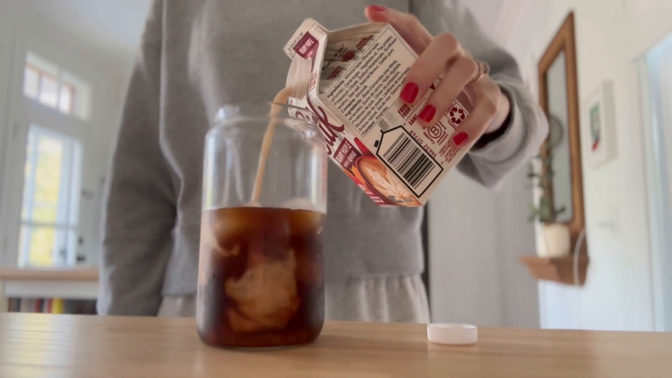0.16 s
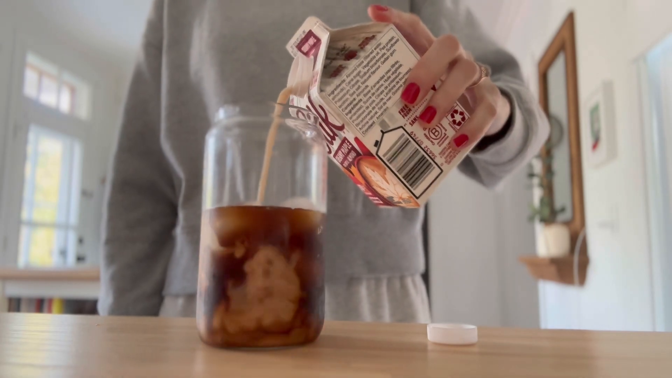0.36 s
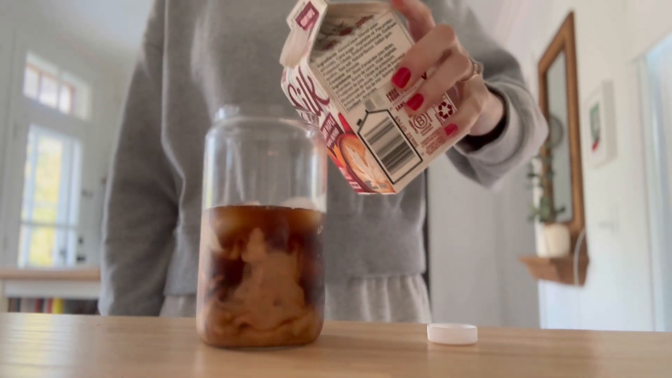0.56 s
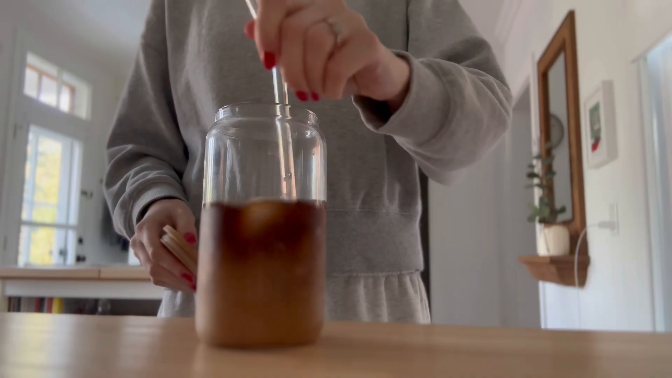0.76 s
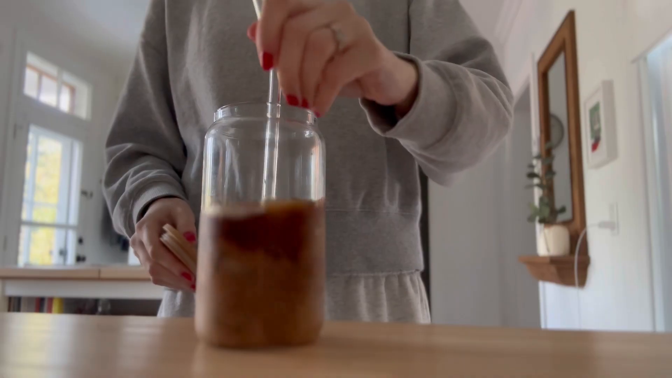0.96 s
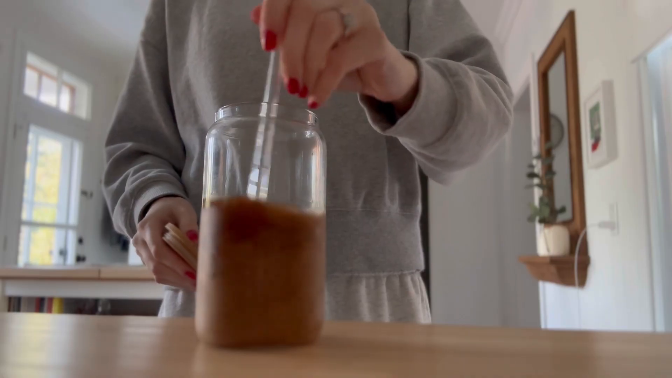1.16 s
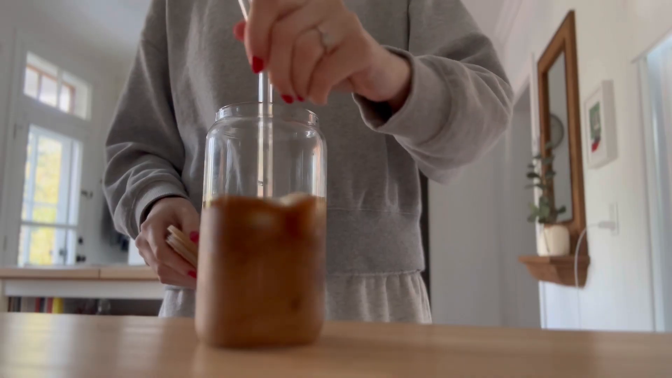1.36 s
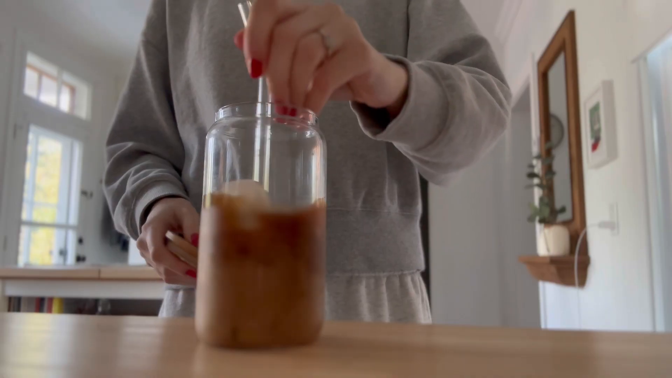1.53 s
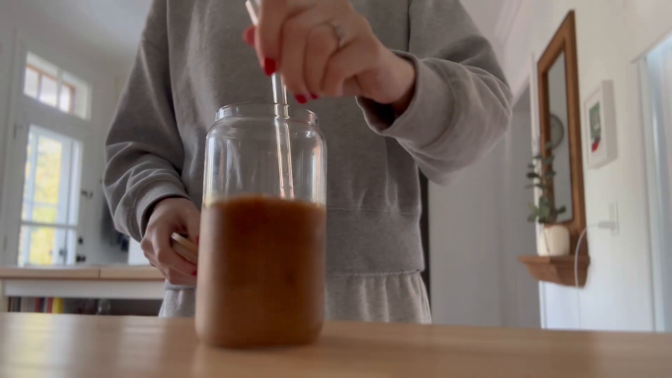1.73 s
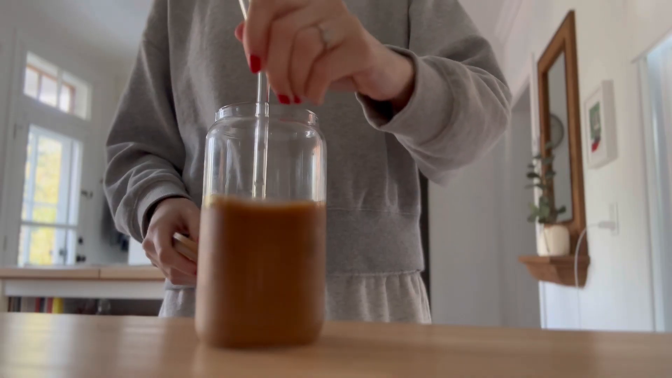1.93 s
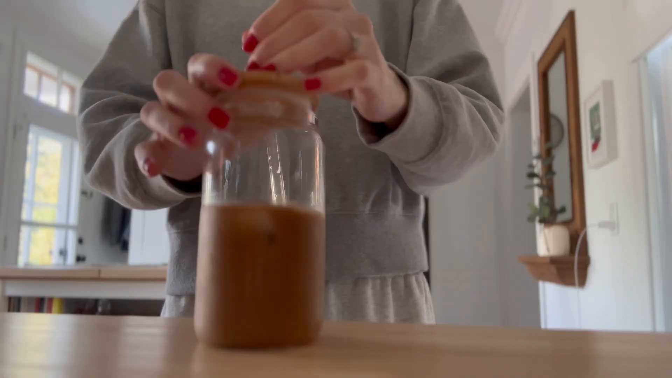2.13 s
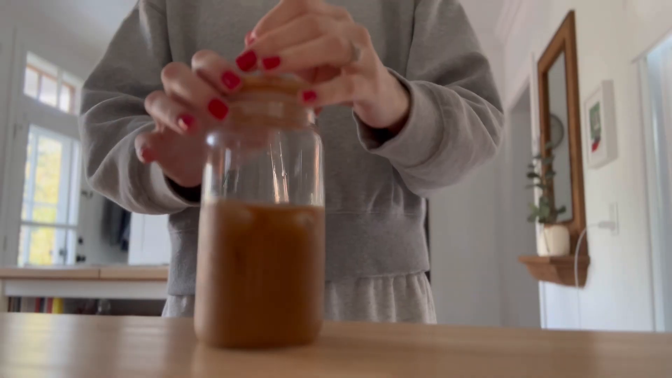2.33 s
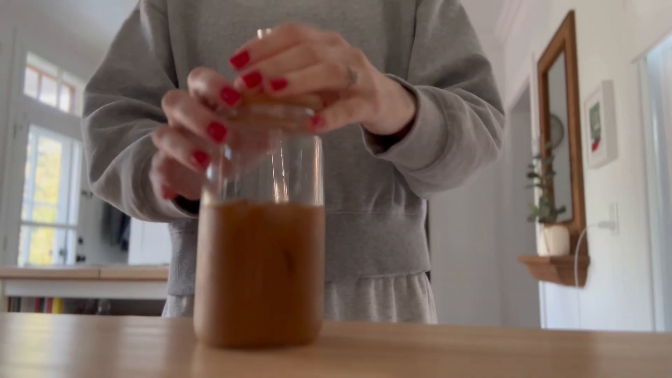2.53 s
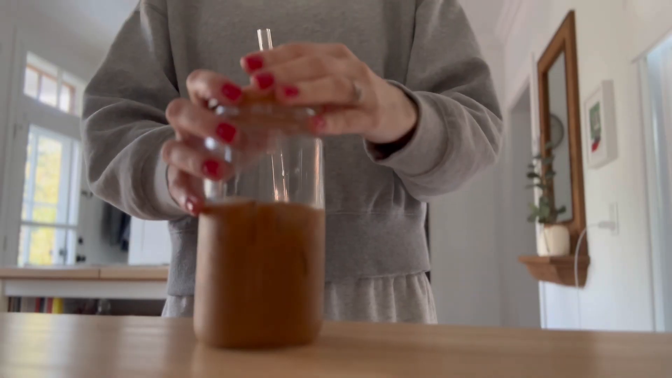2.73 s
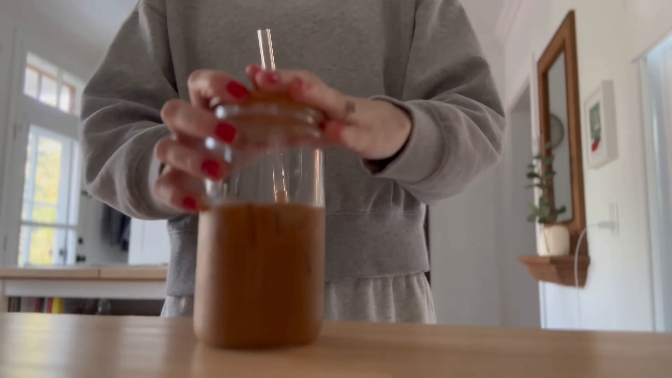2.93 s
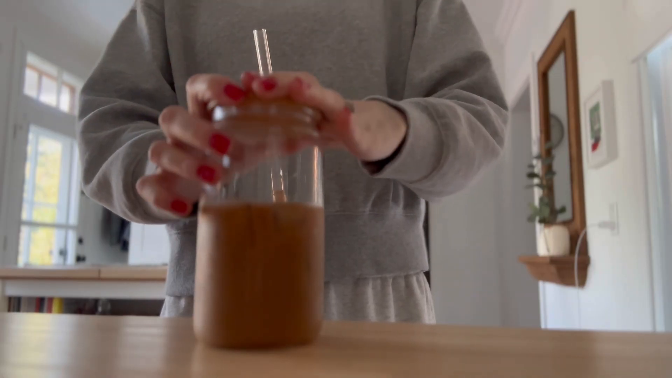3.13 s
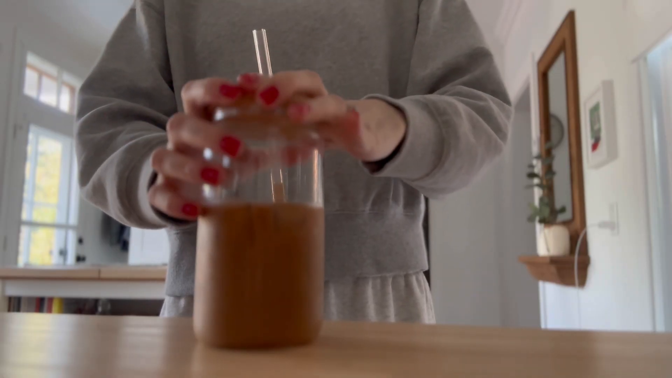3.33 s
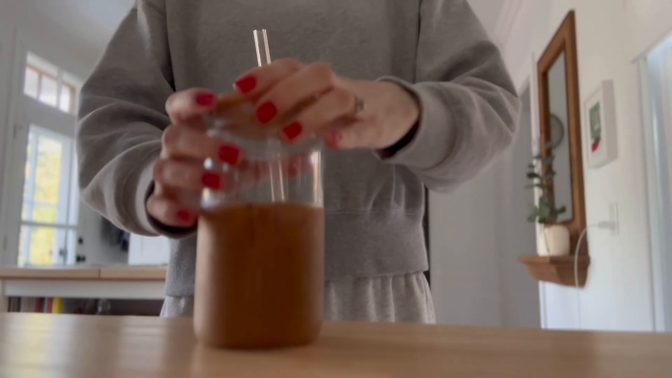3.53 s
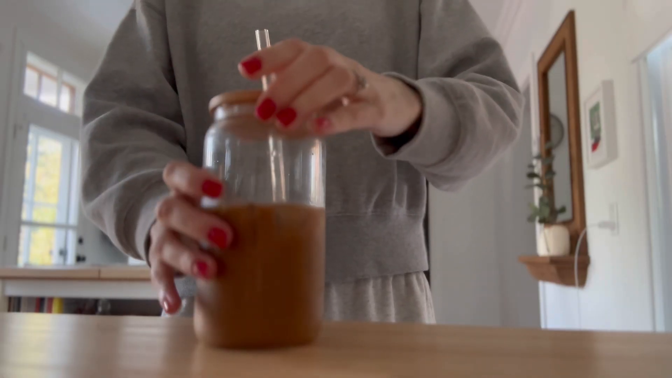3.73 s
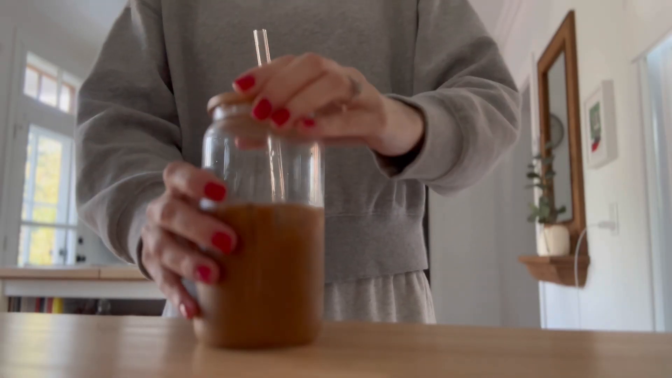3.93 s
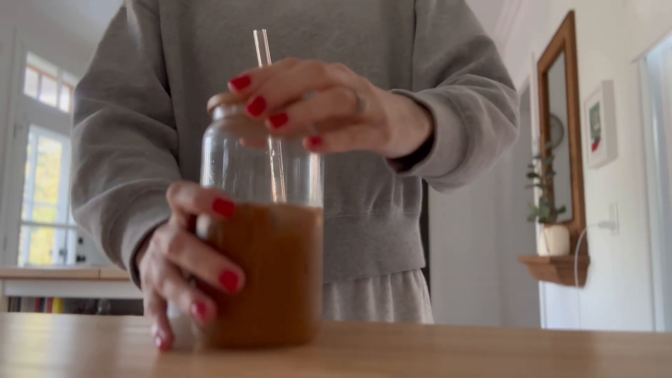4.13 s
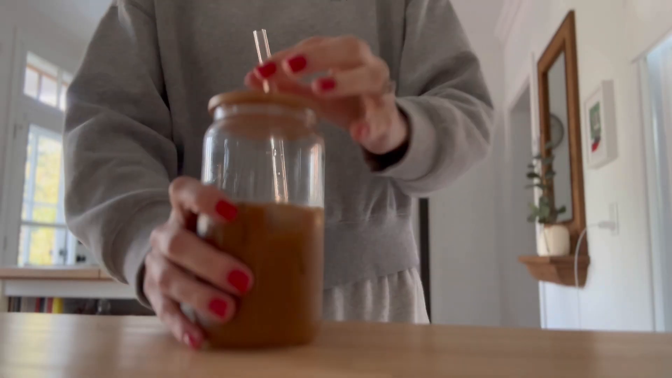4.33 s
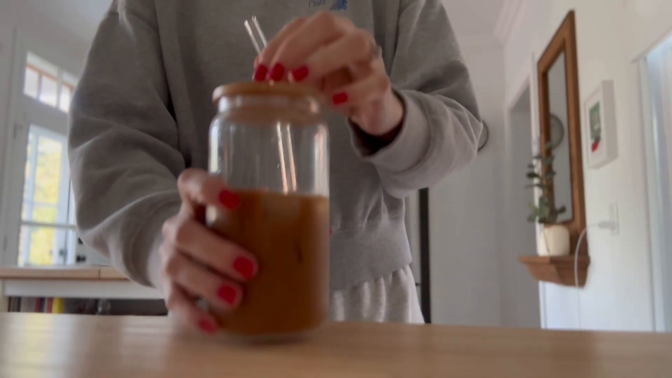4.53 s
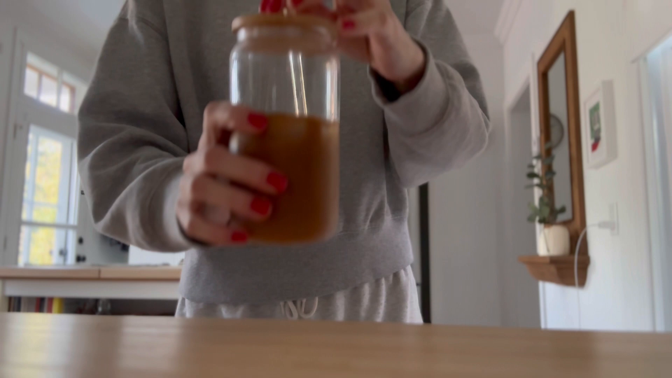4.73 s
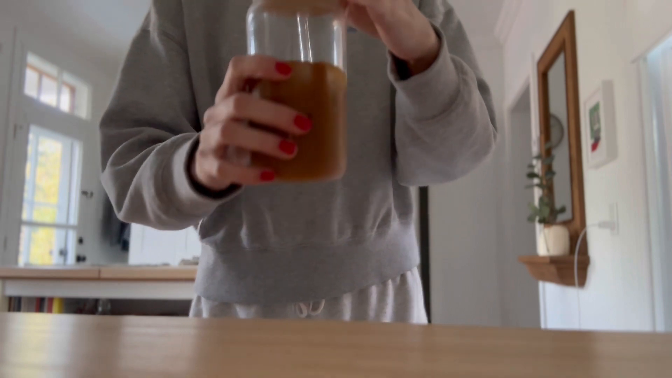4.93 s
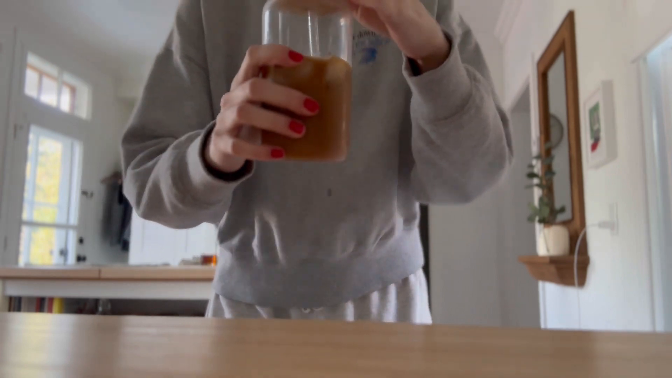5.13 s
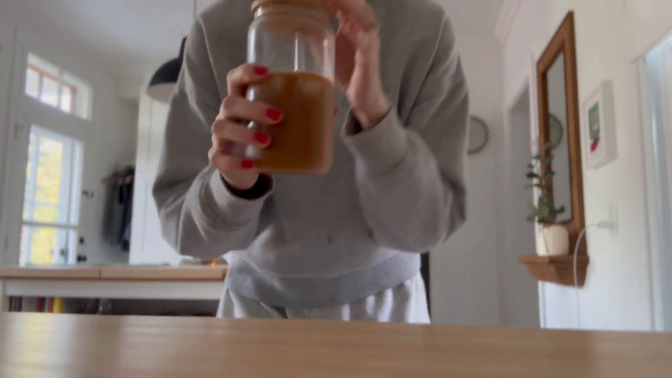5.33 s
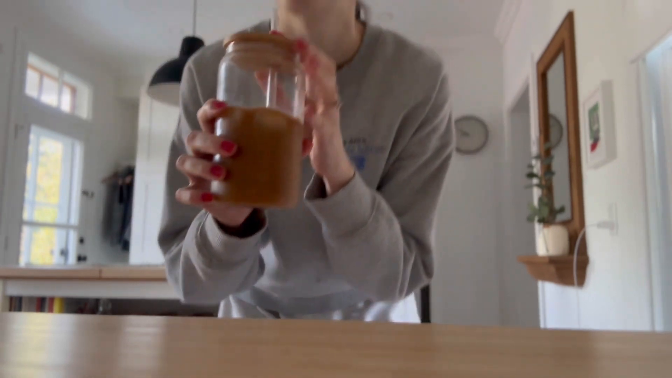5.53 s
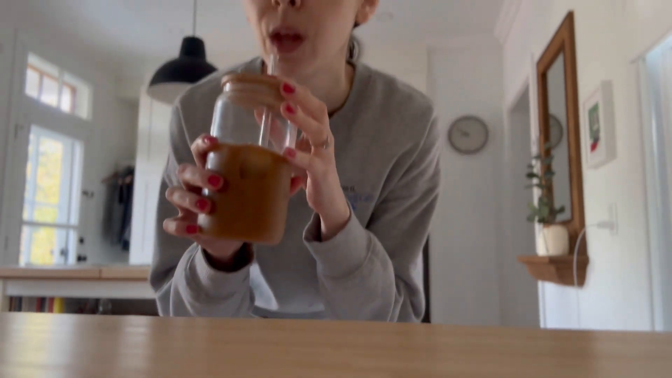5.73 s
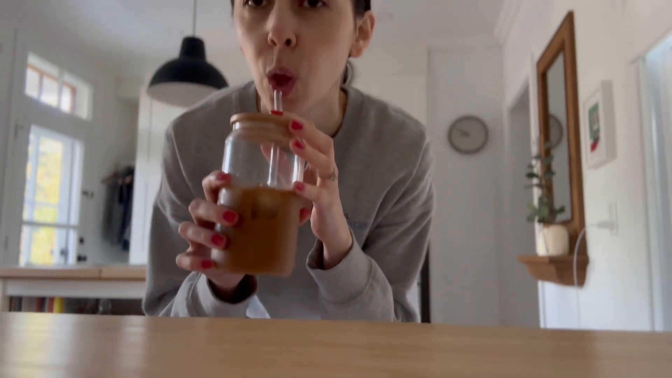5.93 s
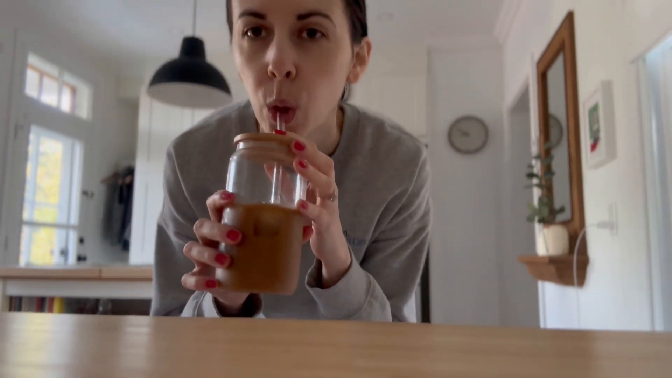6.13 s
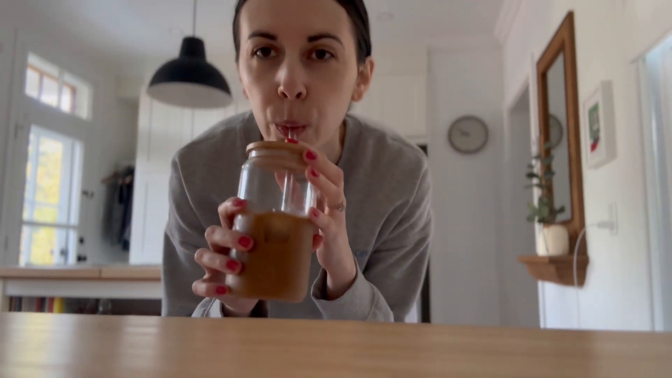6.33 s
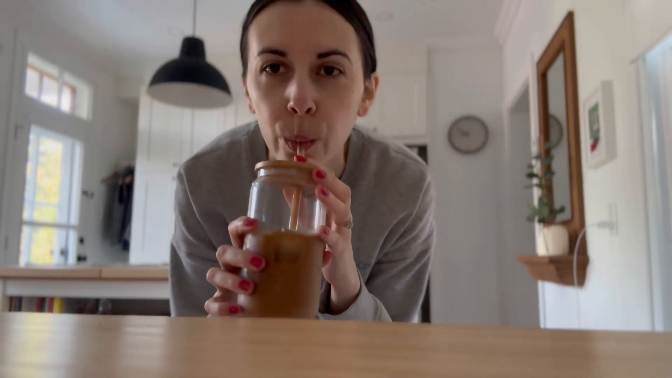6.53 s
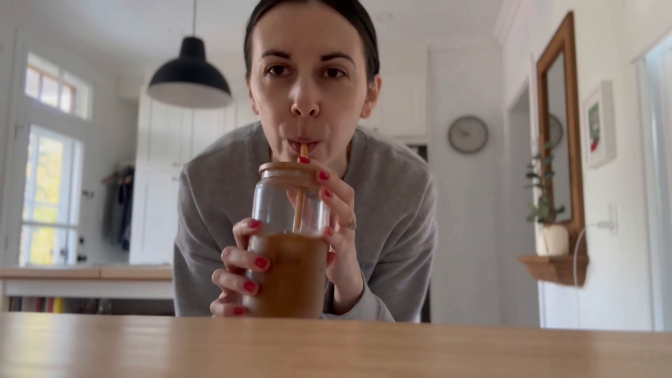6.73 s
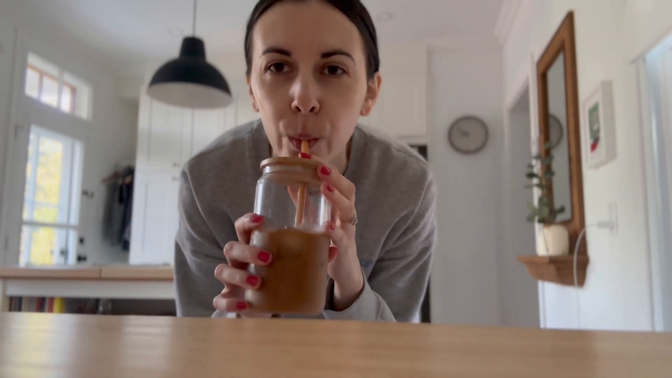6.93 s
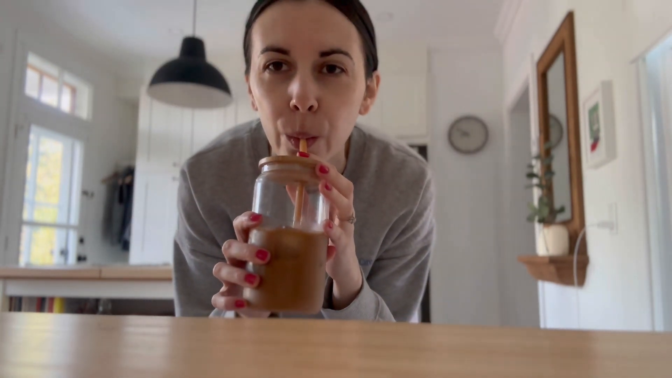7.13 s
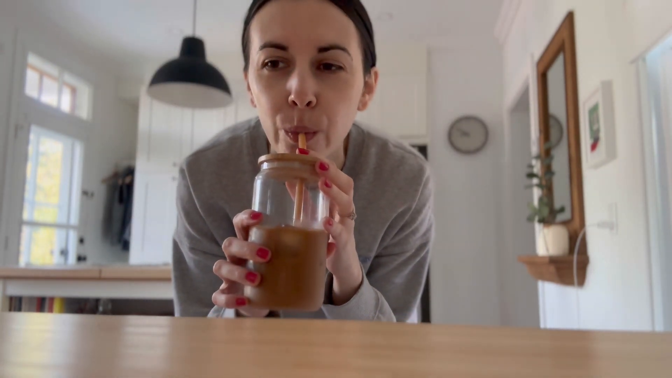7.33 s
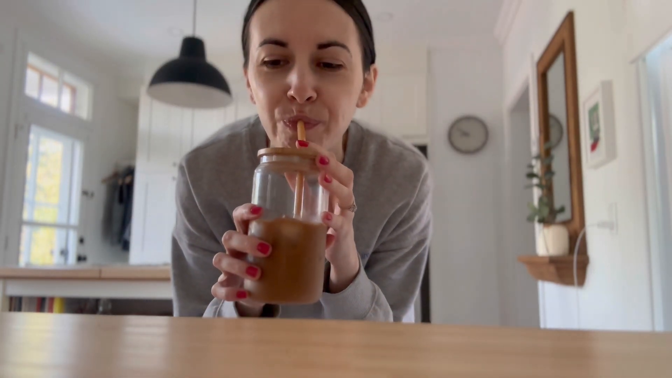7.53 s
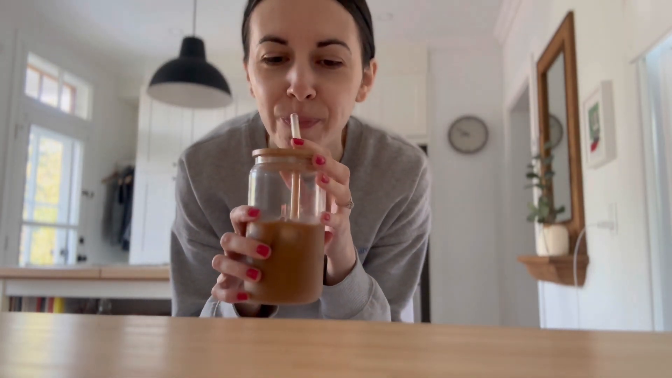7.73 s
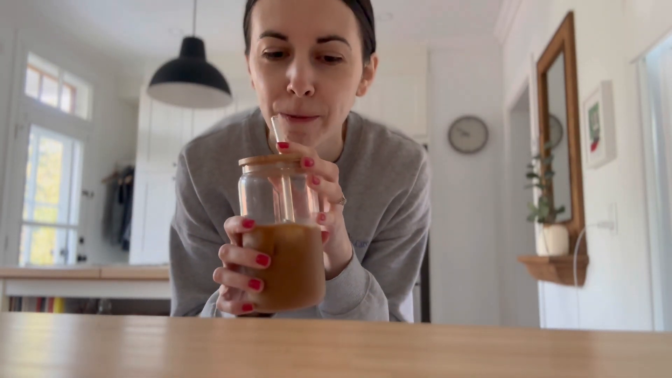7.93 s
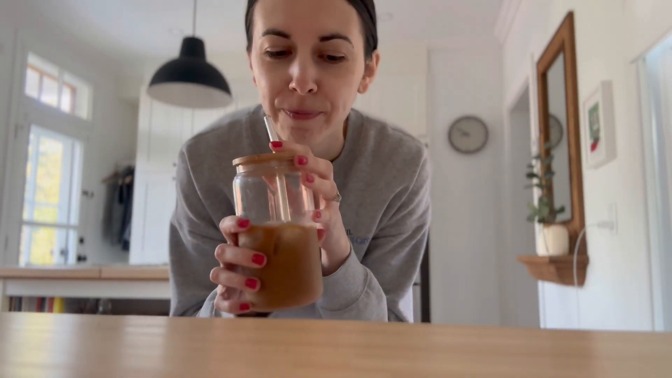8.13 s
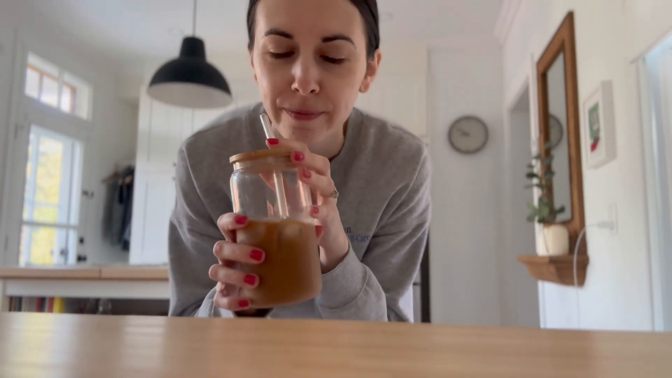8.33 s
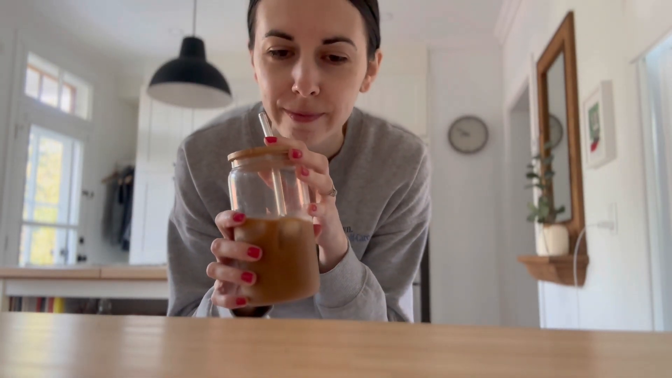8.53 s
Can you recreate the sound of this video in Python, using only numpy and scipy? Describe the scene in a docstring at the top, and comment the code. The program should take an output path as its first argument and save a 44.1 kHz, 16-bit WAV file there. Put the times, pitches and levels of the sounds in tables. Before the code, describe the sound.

Ice cubes and a glass straw clink and rattle rapidly in a jar of drink, then a lid knocks on and the jar is quietly handled.

```python
"""Ice cubes and a glass straw knock against a half-full glass jar: each blow rings a set of decaying modes.
Place: a quiet kitchen; a drink is stirred, a wooden lid pressed on, the jar lifted, the ice settles softly.
Dull knocks are short falling notes; slosh, sleeves and hands are shaped noise; air pockets ring briefly.
Behind them lie a band-shaped room tone and low drone lines; dying noise gives the kitchen's echoes.
Distance: near. Microphone: a close pair, whose phase and level gaps depend on pitch."""
import sys
import numpy as np
from scipy import signal
from scipy.fft import rfft, irfft, next_fast_len
from scipy.io import wavfile

SR = 44100
rng = np.random.default_rng(int(sys.argv[2]) if len(sys.argv) > 2 else 0)


def magnitude_from_level(level_db):
    """Linear magnitude for a level in decibels (20 dB per decade)."""
    exponent = np.asarray(level_db, float) / 20
    return 10 ** exponent


def persist_wave(psi):
    """Save psi, clipped to +-1, as 16-bit WAV."""
    counts = np.round(np.clip(psi, -1, 1) * 32767).astype(np.int16)
    wavfile.write(sys.argv[1], SR, np.atleast_2d(counts).T)


N = 377937   # length in samples

# Room tone. Each row: frequency in Hz, relative density in dB per Hz.
ROOM_SPECTRUM = [(26, -30.5), (45, -11), (96, 3.5), (154, -4.5), (192, -2.5), (539, -14), (640, -15.5),
                 (838, -20.5), (1300, -30), (1630, -37), (4040, -50), (8870, -47.5), (16000, -64)]
ROOM_DB = -53.5   # rms of the room tone, dB
# Appliance drone. Each row: frequency in Hz, nominal rms level in dB.
DRONE_LINES = [(37.5, -59.5), (76, -66.5), (147, -59.5)]
# Likeness of the background at the two microphones. Each row: frequency in Hz, left-right correlation.
BACKGROUND_LIKENESS = [(60, 0.84), (120, 0.83), (300, 0.39), (600, -0.7), (1000, -0.31), (1700, -0.27),
                       (5000, -0.53), (8000, 0.95), (12000, .6)]

# Sleeves and hands brush past. Each row: peak in seconds, rise in seconds, fall in seconds,
# body level in dB, hiss level in dB.
HAND_BRUSHES = [(.005, 0.012, 0.13, -51, -65), (0.141, 0.027, 0.12, -51, -63),
                (.314, 0.37, 0.11, -47.5, -75), (.484, 0.011, .03, -51, -71),
                (0.573, 0.018, .16, -44.5, -58), (2.754, 0.03, 0.45, -50.5, -66.5),
                (3.04, 0.014, .025, -42, -67.5), (3.16, .3, 0.24, -54.5, -75.5), (3.4, .12, .4, -52, -81.5),
                (3.62, 0.64, 0.059, -53, -70.5), (3.78, .012, 0.041, -44.5, -89.5),
                (4.074, .25, 0.22, -49, -62.5), (4.272, 0.23, .1, -52, -79),
                (5.922, 0.092, 0.16, -45, -54.5), (6.194, .045, 0.078, -47.5, -88),
                (6.324, .2, 0.09, -51, -63), (6.414, .07, 0.29, -53.5, -72), (6.59, 0.45, .055, -53, -71.5),
                (6.83, 0.26, 0.1, -59.5, -84), (7.03, .035, .5, -54.5, -74), (7.178, .1, 0.21, -51, -82),
                (7.816, .045, 0.75, -51, -67), (8.106, .012, 0.024, -54.5, -103.5),
                (8.368, .055, 0.025, -49.5, -97), (8.44, 0.088, 0.46, -49.5, -62.5)]
BRUSH_SWING_DB = 20   # change in dB within one rise or fall time
# Body of the rustle. Each row: frequency in Hz, relative density in dB per Hz.
BODY_SPECTRUM = [(88, -27.5), (150, -2), (173, 2.5), (466, 0.5), (759, -7), (832, -11.5), (1010, -1.5),
                 (1190, -16.5), (3500, -33.5), (4550, -53.5), (7700, -120)]
# Hiss of the rustle. Each row: frequency in Hz, relative density in dB per Hz.
HISS_SPECTRUM = [(880, -37), (1500, 3), (2000, -4.5), (2410, 0), (2660, -8), (3000, -5), (9950, -25.5),
                 (13000, -40), (16000, -66)]
# Glass modes set humming by fingers. Each row: frequency in Hz, gain on the hiss in dB, t60 in seconds.
RUBBED_MODES = [(1689.5, -25, 0.022), (2910, -29.5, .04), (3489, -28.5, 0.022)]

# The drink sloshes while stirred, then while the jar is lifted: one list of rows for each.
# Each row: time in seconds, body level in dB, hiss level in dB.
SLOSH_LEVELS = [
    [(.756, -61, -34), (.94, -41, -55), (1.1, -48.5, -59), (1.27, -47.5, -56), (1.43, -43.5, -68),
     (1.83, -49, -77), (2.47, -46, -58.5), (2.72, -58.5, -57.5)],
    [(4.32, -68.5, -71), (4.46, -54.5, -73), (4.65, -56.5, -61), (4.95, -56.5, -60.5), (5.08, -56.5, -65.5),
     (5.33, -50, -54), (5.48, -52.5, -60.5), (5.84, -61.5, -67)],
]
# Air pockets in the slosh: average number per second, cycles rung to -60 dB, rms in dB against the body.
GURGLES_PER_S, GURGLE_CYCLES, GURGLE_DB = 150, 20, -6

# Dull knocks through drink, lid and table. Each row: start in seconds, nominal note level in dB,
# drive of the table boom in dB, pitch in Hz, t60 in seconds.
DULL_KNOCKS = [(0.284, -27, -59, 250, 0.013), (0.566, -35, -43, 255, 0.015), (0.905, -23, -32, 384, 0.037),
               (0.978, -22, -40, 398, 0.033), (1.008, -18, -37.5, 382, 0.06),
               (1.038, -28.5, -36.5, 399.5, 0.088), (1.228, -25, -38, 416, 0.062),
               (1.3, -36.5, -42, 370, 0.16), (1.325, -32.5, -37.5, 425, 0.1),
               (1.423, -27.5, -44, 399, 0.075), (1.55, -28.5, -41.5, 380, 0.058),
               (1.618, -26.5, -38.5, 385, 0.09), (1.926, -37, -47, 411, 0.25),
               (2.143, -23, -37, 627, 0.014), (2.291, -19, -38.5, 355, 0.034),
               (2.293, -22, -51.5, 600.3, 0.04), (2.382, -27, -29, 613, 0.045),
               (2.409, -7.5, -43.5, 592, 0.045), (2.607, -32, -42, 403, 0.053),
               (3.036, -29, -25.5, 284, 0.063), (3.781, -20.5, -25, 355, 0.023),
               (4.372, -35.5, -37, 372, 0.029), (5.579, -36, -39, 343, 0.045),
               (8.325, -45.5, -60.5, 740, 0.034)]
# Table top modes. Each row: frequency in Hz, relative level in dB, t60 in seconds.
TABLE_MODES = [(90, 1, 0.083), (120, -3, 0.2), (194, -3, 0.14)]

# Modes of the open jar, in five families: bright, low, wall, upper, treble.
# Each row: nominal frequency in Hz, relative level in dB, nominal t60 in seconds.
OPEN_MODES = [
    [(4080, -2, .03), (4500, 0, .04), (4690, 0, .05), (5250, 0, .03), (5800, -3, .02)],
    [(965, -6, .05), (1060, -6, .07), (1143, 3, .12), (1235, -8, .07), (2325, -6, .05)],
    [(1649, -1, .135), (1688, -7, .08)],
    [(2060, -8, .04), (2400, -10, .04), (2778, -4, .06), (2850, -1, .1), (3013, -5, .05), (3420, -9, .08)],
    [(6520, -3, .04), (7600, -4, .05), (7850, -4, .035), (8600, -9, .02), (9650, -6, .035),
     (10300, -8, .02), (11800, -9, .035), (12400, -7, .03), (13400, -11, .03)],
]
# Modes of the capped jar in the hand, in the same five families.
# Each row: nominal frequency in Hz, relative level in dB, nominal t60 in seconds.
CAPPED_MODES = [
    [(4500, -10, 0.028), (5000, 0.5, 0.03), (5210, -13, 0.065), (5730, 1, 0.035)],
    [(1025, -2, 0.037), (1207, -3.5, 0.035)],
    [(1675, 4, 0.041), (1817, -11, 0.12)],
    [(1994, -8, 0.055), (2380, -5.5, 0.021), (2904, 5, 0.017), (3538, -2.5, 0.046)],
    [(7510, 0.5, .04), (8070, -4, .03), (8800, -7, 0.018), (11300, -18.5, 0.028), (11700, -21, 0.018)],
]
# Ice and straw strike the glass. Each row: start in seconds, then nominal levels in dB of the low rings,
# wall rings, upper rings and treble rings.
GLASS_BLOWS = [(.7556, -35, -19.5, -36, -34.5), (.838, -45, -18.5, -27.5, -43), (.854, -53, -27, -32, -45),
               (.8655, -46, -24, -29, -62), (.9, -47, -27.5, -37, -39.5), (.9107, -22.5, -33, -32, -35.5),
               (.9432, -57, -11, -22.5, -60), (.9764, -23, -28, -31, -31), (1.009, -12.5, -24, -36, -32),
               (1.0375, -17.5, -12, -32, -37), (1.0646, -49, -31, -24.5, -42), (1.076, -31, -10, -57, -62),
               (1.1173, -25.5, -44, -59, -60), (1.1348, -51, -28.5, -46, -49),
               (1.2003, -40.5, -29, -41, -32.5), (1.2206, -55, -22, -27, -31),
               (1.228, -36, -27, -27.5, -38), (1.2554, -43, -26, -26, -41), (1.272, -61, -23, -43, -38),
               (1.2968, -39, -43, -28.5, -43), (1.3043, -59, -16.5, -29, -34.5),
               (1.3265, -22, -28, -35, -38.5), (1.3812, -30.5, -27, -59, -36), (1.4205, -27, -40, -32, -63),
               (1.4658, -28, -26, -60, -67), (1.488, -40.5, -22.5, -29, -58), (1.5072, -38, -19, -39, -63),
               (1.5316, -31, -15.5, -28, -61), (1.5466, -20, -14.5, -17.5, -32),
               (1.587, -40, -19, -23, -42), (1.6145, -30, -17, -21.5, -15), (1.6662, -47, -19, -26.5, -43),
               (1.699, -54, -22, -21, -36.5), (1.744, -60, -18, -29, -50), (1.7647, -47, -24, -23, -42),
               (1.7972, -60, -13, -20.5, -70), (1.8024, -55, -15.5, -34, -48),
               (1.8313, -52, -40.5, -27, -42), (1.8767, -57, -36, -36, -47), (1.9085, -65, -23.5, -35, -45),
               (1.9251, -45.5, -37, -19.5, -72), (1.9321, -32.5, -4, -35, -35),
               (1.9765, -57, -44, -46, -51.5), (1.9949, -68, -26, -33.5, -81),
               (2.043, -60, -26.5, -32.5, -64), (2.0768, -55, -36, -38, -81), (2.1134, -59, -63, -46, -54),
               (2.143, -42, -19, -18, -53), (2.265, -56, -31, -44, -58), (2.2744, -64.5, -19.5, -36, -65),
               (2.2896, -31, -19.5, -25.5, -25), (2.4084, -21.5, -18.5, -58, -56),
               (2.4983, -29.5, -20, -25, -43), (2.5635, -64, -34.5, -52, -57),
               (2.6045, -43.5, -24.5, -26, -58), (2.691, -66, -33, -47.5, -67.5),
               (4.074, -67, -53.5, -56.5, -73), (4.3414, -66.5, -58, -49.5, -71),
               (4.4795, -57.5, -48, -44, -86.5), (4.4972, -74, -47.5, -49.5, -79),
               (4.6714, -57, -53.5, -48, -81.5), (4.6884, -47.5, -54, -50, -69),
               (4.7151, -48.5, -58, -53.5, -72.5), (4.834, -46, -43.5, -35, -73),
               (4.8842, -63.5, -44, -55, -58), (4.9073, -49, -44, -44, -63), (4.918, -67, -42, -41.5, -52),
               (4.9658, -69, -41, -49.5, -62), (5.0685, -81, -43, -47.5, -63),
               (5.1679, -25.5, -50.5, -39, -40), (5.2507, -40, -45, -54, -70),
               (5.2724, -43.5, -52, -58, -81), (5.2946, -48.5, -41, -55.5, -64),
               (5.474, -33, -60, -44.5, -53), (5.588, -48, -54, -60, -59), (5.6361, -64, -54, -42.5, -72.5),
               (5.6855, -69.5, -42.5, -48, -77.5), (5.8097, -64.5, -63.5, -54.5, -63.5),
               (6.406, -61, -55.5, -62, -80.5), (6.595, -58.5, -55.5, -55.5, -91.5),
               (6.789, -75.5, -63, -66.5, -78.5), (7.421, -56, -39.5, -35, -81.5),
               (7.4616, -43.5, -43.5, -48, -71), (7.6238, -81, -60, -61, -82.5),
               (7.731, -79.5, -63, -71, -88), (8.1445, -69.5, -59, -52.5, -80.5),
               (8.378, -82.5, -78, -66.5, -89.5), (8.4853, -75, -55, -50.5, -79),
               (8.5145, -62.5, -63, -63, -83)]
BRIGHT_SHARE, BRIGHT_DB = .7, -6   # bright rings: share of the upper level (rest treble), offset in dB
# Both hands hold the glass from this second; its lower modes then die this many times faster.
GRIP_S, GRIP_DAMPING = 2.2, 3.6
CAPPED_S = 3   # the lid is on from this second
WAVER_DB, WAVER_PER_S = 3, 35   # the moving drink makes rings waver: spread in dB, rate in Hz
# Small rattle of the cubes between blows. Each row: time in seconds, base level in dB.
RATTLE_LEVELS = [(.76, -58), (.9, -55), (1.07, -54.5), (1.17, -68.5), (1.3, -51.5), (1.42, -56.5),
                 (1.6, -56), (1.8, -61.5), (2.0, -67), (2.2, -72.5)]
RATTLE_PER_S = 260   # average bumps per second
# Faint ticks of floating ice with the jar in the hand: first second, average per second, base level in dB.
TICKS_FROM_S, TICKS_PER_S, TICKS_DB = 4.3, 22, -84
# Long rings of the glass straw. Each row: nominal frequency in Hz, relative level in dB, nominal t60 in seconds.
STRAW_MODES = [(2502, -0.5, 0.33), (3380, -16.5, 0.34), (4690, -7, 0.11)]
# Blows that reach the straw. Each row: start in seconds, nominal level in dB.
STRAW_BLOWS = [(2.29, -38.5), (4.832, -43), (5.1659, -48.5), (5.2946, -47), (5.6365, -50.5), (6.595, -67),
               (6.789, -67), (7.419, -40.5), (7.6246, -65)]

# Echoes by band. Each row: low edge in Hz, high edge in Hz, t60 in seconds, relative level in dB,
# left-right correlation.
KITCHEN_ECHOES = [(152, 250, 0.64, -29.5, 0.87), (940, 1600, 0.12, -31.5, 0.76),
                  (2150, 8300, 0.41, -37.5, 0.36), (5350, 21000, 0.18, -34.5, 0.66)]
# Phase gap of the microphones for the jar. Each row: frequency in Hz, lead of the left in radians.
LEFT_LEAD = [(100, -.2), (200, -.9), (380, .7), (600, -1.2), (1140, .8), (1650, -.45), (2400, -.5),
             (2900, 1.2), (3420, -.3), (5250, .8), (6500, 2.2), (7100, -1.2), (7700, -1.9), (9700, -.5),
             (12200, .95)]
# Level gap of the microphones for the jar. Each row: frequency in Hz, left minus right in dB.
LEFT_TILT = [(100, -2), (600, -3), (1140, -5), (1650, 1), (2900, -1.5), (5250, 1), (6500, -1.5), (7700, 5),
             (9700, 1), (12200, -2.5)]
CEILING = .9   # the loudest peaks round off towards this height


def rms_one(x):
    """Scales a sound to rms 1."""
    return x / np.sqrt(np.mean(x ** 2) + 1e-20)


def in_time(rows):
    """Draws every column after the first as a line over time."""
    s, *columns = np.transpose(rows)
    return [np.interp(np.arange(N) / SR, s, column) for column in columns]


def at_hz(points, hz):
    """Reads a curve between its points along log frequency."""
    points = np.array(points)
    return np.interp(np.log(hz), np.log(points[:, 0]), points[:, 1])


def drift(rate):
    """Slow chance of spread 1: noise at every 40th sample through a double one-pole low-pass."""
    pole = np.exp(-80 * np.pi * rate / SR)
    white = rng.standard_normal(N // 40 + 2002)
    slow = signal.lfilter([1], [1, -2 * pole, pole * pole], white)[2000:]   # settled part only
    return np.interp(np.arange(N) / 40, np.arange(len(slow)), rms_one(slow))


def band_pass(order, low_hz, high_hz, x):
    """Butterworth band-pass between two frequencies."""
    return signal.sosfilt(signal.butter(order, [low_hz, high_hz], "band", fs=SR, output="sos"), x)


def pulses(times, sizes):
    """Single-sample clicks on a tiny offset that keeps the filters from stalling on near-zero numbers."""
    out = np.full(N, 1e-18)
    np.add.at(out, np.round(np.asarray(times) * SR).astype(int), sizes)
    return out


def chance_sizes():
    """Uneven strengths: most are small, the largest stand 12 dB above the base."""
    return magnitude_from_level(4 * np.minimum(rng.exponential(1, N), 3))


def ring(clicks, hz, t60):
    """Two-pole resonator: a unit click sets a decaying sine of starting height 1 ringing."""
    radius, turn = magnitude_from_level(-60 / (t60 * SR)), 2 * np.pi * hz / SR
    return signal.lfilter([0, np.sin(turn)], [1, -2 * radius * np.cos(turn), radius * radius], clicks)


def banded_noise(spectrum, patchy_db):
    """Half-octave bands of stereo noise, each with its own level, flicker and likeness; rms 1."""
    out, edges = 0, 24 * 2 ** np.arange(0, 9.6, .5)
    white = rng.standard_normal((2, 2, N))
    for k, (low_hz, high_hz) in enumerate(zip(edges, edges[1:])):
        hz = np.sqrt(low_hz * high_hz)
        if not spectrum[0][0] < hz < spectrum[-1][0]:
            continue
        mid, side = band_pass(2, low_hz, high_hz, white[k % 2])   # neighbours use different noise
        alike = at_hz(BACKGROUND_LIKENESS, hz)
        gain = magnitude_from_level(at_hz(spectrum, hz) + patchy_db * drift(6.1))
        out = out + gain * (np.sqrt(1 + alike) * mid + np.sqrt(1 - alike) * side * [[1], [-1]])
    return rms_one(out)


def room_tone():
    """The kitchen at rest: steady low-weighted noise whose bands flicker in level."""
    return magnitude_from_level(ROOM_DB) * banded_noise(ROOM_SPECTRUM, patchy_db=3.5)


def hum():
    """Low drone lines, each a sine that wavers a little in strength and phase."""
    t, out = np.arange(N) / SR, 0
    for hz, db in DRONE_LINES:
        strength = np.sqrt(2) * magnitude_from_level(db + 1.1 * drift(1.2))
        out = out + strength * np.sin(2 * np.pi * hz * t + .6 * drift(2))
    return out


def slosh():
    """Strength of body and hiss of the moving drink, following its two stretches of motion."""
    t, out = np.arange(N) / SR, 0
    for rows in SLOSH_LEVELS:
        moving = (t > rows[0][0]) & (t < rows[-1][0])
        out = out + magnitude_from_level(in_time(rows)) * moving
    return out


def movement(drink):
    """Strength of body and hiss: slosh and brushes add up in power."""
    t, power = np.arange(N) / SR, drink ** 2
    for s, rise, fall, body_db, hiss_db in HAND_BRUSHES:
        near = slice(max(0, round((s - 2 * rise) * SR)), round((s + 2 * fall) * SR))
        away = np.maximum((s - t[near]) / rise, (t[near] - s) / fall)
        power[:, near] += magnitude_from_level(np.array([[body_db], [hiss_db]]) - BRUSH_SWING_DB * away) ** 2
    return np.sqrt(power)


def rustle(body, hiss):
    """Sleeves, hands and slosh: stereo noise under two strengths, its body coloured by hollow notes."""
    out = body * banded_noise(BODY_SPECTRUM, patchy_db=3.0)
    out += magnitude_from_level(5.0) * band_pass(1, 800, 1000, out)   # a hollow note
    out += magnitude_from_level(-3) * band_pass(1, 450, 530, out)   # and a lower one
    return out + hiss * banded_noise(HISS_SPECTRUM, patchy_db=2.4)


def rubbed_glass(hiss):
    """Fingers rub the glass unevenly; their noise sets a few of its modes humming."""
    fingers = hiss * magnitude_from_level(5 * drift(4)) * rng.standard_normal(N)
    return sum(magnitude_from_level(db) * ring(fingers, hz, t60) for hz, db, t60 in RUBBED_MODES)


def gurgles(drink):
    """Air pockets ring a few cycles at scattered pitches, left or right of centre, as strong as the slosh lets them."""
    born = (rng.random(N) < GURGLES_PER_S / SR) * chance_sizes()
    dealt, sides = rng.integers(0, 14, N), rng.standard_normal((2, N))
    rings = 0
    for k, hz in enumerate(np.geomspace(320, 1450, 14)):
        rings = rings + ring(born * (dealt == k) * sides + 1e-18, hz, GURGLE_CYCLES / hz)
    soft = signal.sosfilt(signal.butter(2, 1800, fs=SR, output="sos"), rings)
    mid, side = magnitude_from_level(GURGLE_DB) * drink[0] * rms_one(soft)
    return mid + magnitude_from_level(-2.5) * side * [[1], [-1]]


def knocks():
    """A short woody note per knock; the heavy table top answers a moment later with a soft boom."""
    out, t = np.zeros(N), np.arange(SR // 5) / SR
    swell = 1 - np.exp(-t / 0.00051)
    for s, peak_db, _, hz, t60 in DULL_KNOCKS:
        at = round(s * SR)
        out[at:at + len(t)] += magnitude_from_level(peak_db - 60 * t / t60) * swell * np.sin(2 * np.pi * hz * t)
    rows = np.array(DULL_KNOCKS)
    push = band_pass(2, 60, 160, pulses(rows[:, 0] + 0.0065, magnitude_from_level(rows[:, 2])))
    return out + sum(magnitude_from_level(db) * ring(push, hz, t60) for hz, db, t60 in TABLE_MODES)


def floating_ice():
    """Stray ticks against the capped jar; each wall and upper mode is struck with a strength of its own."""
    born = (rng.random(N) < TICKS_PER_S / SR) & (np.arange(N) > TICKS_FROM_S * SR)
    sizes, out = born * magnitude_from_level(TICKS_DB) * chance_sizes(), 0
    for family in CAPPED_MODES[2:4]:
        for hz, db, t60 in family:
            out = out + magnitude_from_level(db) * ring(sizes * rng.standard_normal(N) + 1e-18, hz, t60)
    return out


def cube_rattle():
    """Tiny uneven bumps of the cubes at random moments while the straw goes round."""
    t = np.arange(N) / SR
    stirring = (t > RATTLE_LEVELS[0][0]) & (t < RATTLE_LEVELS[-1][0])
    born = (rng.random(N) < RATTLE_PER_S / SR) & stirring
    bumps = born * chance_sizes() * rng.choice([-1, 1], N) * magnitude_from_level(in_time(RATTLE_LEVELS)[0])
    return signal.lfilter([.5], [1, -.7], bumps)   # wet ice meets glass softly


def rattled_jar(rattle):
    """The bumps of the cubes set every mode of the open jar ringing."""
    return sum(magnitude_from_level(db) * ring(rattle, hz, t60) for family in OPEN_MODES for hz, db, t60 in family)


def with_bright(blows):
    """Adds the strength of the bright rings to each blow, mixed from its upper and treble rings."""
    rows = np.array(blows)
    bright_db = BRIGHT_SHARE * rows[:, 3] + (1 - BRIGHT_SHARE) * rows[:, 4] + BRIGHT_DB
    return np.insert(rows, 1, bright_db, axis=1)


def cracks(blows, rattle, levels_db, t60):
    """The contact itself: short noise bursts in four bands, each following the strength of its rings."""
    bands = [(2, 400, 1500), (4, 1200, 3800), (1, 3800, 7000), (5, 7000, 14000)]   # blow column, Hz, Hz
    out = 0
    for level_db, (column, low_hz, high_hz) in zip(levels_db, bands):
        hits = pulses(blows[:, 0], magnitude_from_level(blows[:, column]))
        touch = magnitude_from_level(level_db) * (hits + np.abs(rattle) * (1200 / low_hz))
        fade = signal.lfilter([1], [1, -magnitude_from_level(-60 / (t60 * SR))], touch)
        fade = signal.lfilter([.03], [1, -.97], fade)   # wet contact builds up over a millisecond
        out = out + band_pass(2, low_hz, high_hz, fade * rng.standard_normal(N))
    return out


def struck_glass(blows, families, spread_db, side_db, grip_s=np.inf):
    """Each blow lands on a new spot: strength, pitch, decay and direction of every mode vary."""
    mid, side, t = np.zeros(N + SR), np.zeros(N + SR), np.arange(SR // 4) / SR
    modes = np.array([mode for family in families for mode in family])
    nominal_hz, mode_db, nominal_t60 = modes[:, :1], modes[:, 1:2], modes[:, 2:]
    column = [1 + k for k, family in enumerate(families) for mode in family]
    signs = (-1) ** np.arange(len(modes))[:, None]   # neighbouring modes start in opposite directions
    for blow in np.array(blows):
        luck = rng.standard_normal((4, len(modes), 1))
        hz = nominal_hz * (1 + 1.5e-6 * nominal_hz * luck[0])
        gripped = (blow[0] > grip_s) & (hz < 2600)
        t60 = nominal_t60 * np.exp(.2 * luck[1]) / np.where(gripped, GRIP_DAMPING, 1)
        chance_db = spread_db * np.clip(hz / 1650, 1, 1.7) * luck[2]   # higher modes vary more
        level_db = blow[column][:, None] + mode_db + chance_db
        swell = 1 - np.exp(-.8 * hz * t)   # the contact lasts about a cycle
        rings = magnitude_from_level(level_db - 60 * t / t60) * swell * np.sin(2 * np.pi * hz * t)
        at = round(blow[0] * SR)
        mid[at:at + len(t)] += (rings * signs).sum(axis=0)
        side[at:at + len(t)] += (rings * magnitude_from_level(side_db) * luck[3]).sum(axis=0)
    return np.array([mid[:N], side[:N]])


def straw():
    """Blows that reach the glass straw start its few long modes."""
    return struck_glass(STRAW_BLOWS, [STRAW_MODES], spread_db=3.0, side_db=-10)


def jar(blows):
    """The glass rings with its open modes until the lid is on, then with its capped ones."""
    capped = blows[:, 0] > CAPPED_S
    stirred = struck_glass(blows[~capped], OPEN_MODES, spread_db=2.2, side_db=-6, grip_s=GRIP_S)
    settled = struck_glass(blows[capped], CAPPED_MODES, spread_db=2.2, side_db=-6)
    return stirred + settled


def kitchen(x):
    """Dense echoes: dying noise per band, starting with the first wall; a shared and a left-right part."""
    t, shared, apart = np.arange(SR // 2) / SR, 0, 0
    for low_hz, high_hz, t60, level_db, alike in KITCHEN_ECHOES:
        noise = band_pass(2, low_hz, high_hz, rng.standard_normal((2, len(t))))
        tails = noise * magnitude_from_level(level_db - 60 * t / t60) * (t > .006)
        shared = shared + np.sqrt(alike) * tails[0]
        apart = apart + np.sqrt(1 - alike) * tails[1]
    return signal.fftconvolve(x, shared)[:N], signal.fftconvolve(x, apart)[:N]


def microphone_pair(x):
    """Both capsules hear the jar, with a phase and level gap that depends on pitch."""
    size = next_fast_len(N)
    hz = np.maximum(np.fft.rfftfreq(size, 1 / SR), 1)
    half = magnitude_from_level(at_hz(LEFT_TILT, hz) / 2) * np.exp(.5j * at_hz(LEFT_LEAD, hz))
    return np.array([irfft(rfft(x, size) * gap, size)[:N] for gap in (half, 1 / half)])


def scene():
    """Sets the struck jar and its echoes before the microphones, over rustle, drink and room."""
    background = room_tone() + hum()
    drink = slosh()
    body, hiss = movement(drink)
    handling = rustle(body, hiss) + gurgles(drink)
    rattle, blows = cube_rattle(), with_bright(GLASS_BLOWS)
    waver = magnitude_from_level(WAVER_DB * drift(WAVER_PER_S))
    glass_mid, glass_side = jar(blows) + straw()
    close = waver * (glass_mid + rattled_jar(rattle))
    close += floating_ice() + knocks() + rubbed_glass(hiss)
    close += cracks(blows, rattle, levels_db=[4, 6, 8.3, 4], t60=0.027)
    shared, apart = kitchen(close)
    side = apart + waver * glass_side
    return microphone_pair(close + shared) + side * [[1], [-1]] + handling + background


def band_limit(x):
    """A steep low-pass at the top of the band."""
    return signal.sosfilt(signal.butter(12, 16310, fs=SR, output="sos"), x)


def record(dry):
    """Peaks round off, the deepest bass is cut and the top rolls off."""
    rounded = CEILING * np.tanh(dry / CEILING)
    mix = band_pass(4, 30, 14500, rounded)
    return band_limit(mix)


dry = scene()
out = record(dry)
persist_wave(out)
```